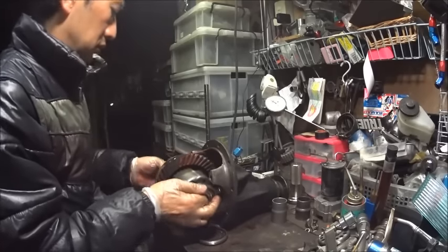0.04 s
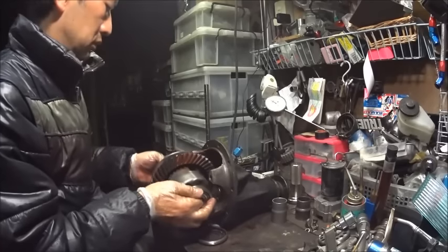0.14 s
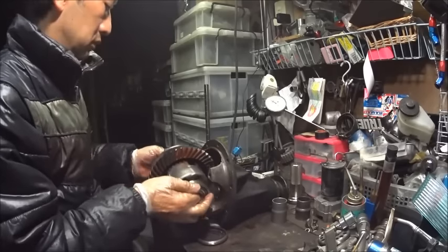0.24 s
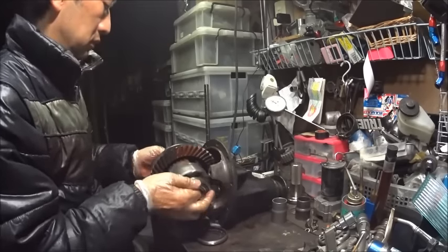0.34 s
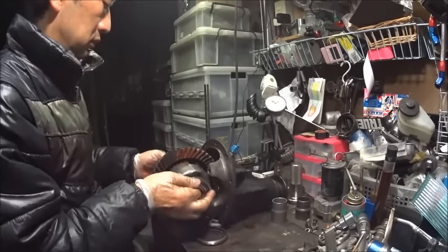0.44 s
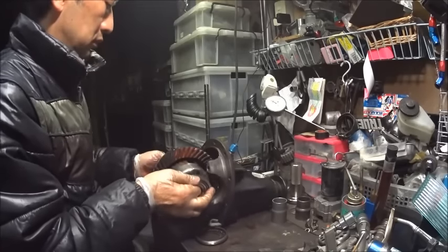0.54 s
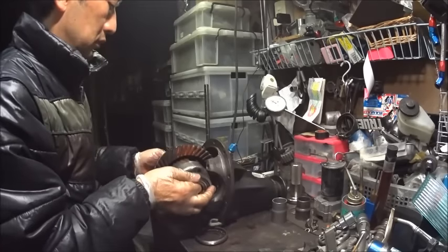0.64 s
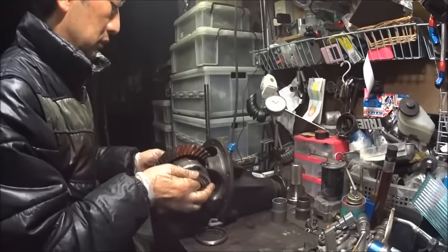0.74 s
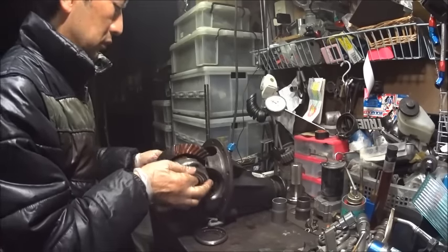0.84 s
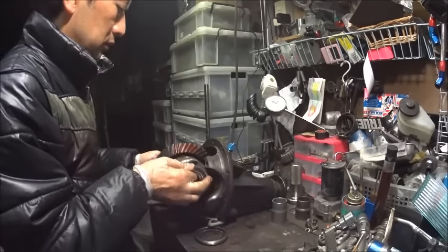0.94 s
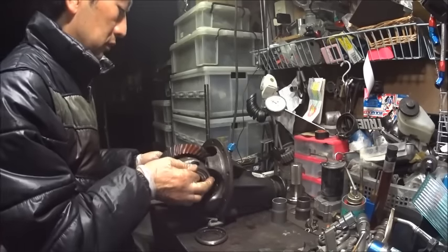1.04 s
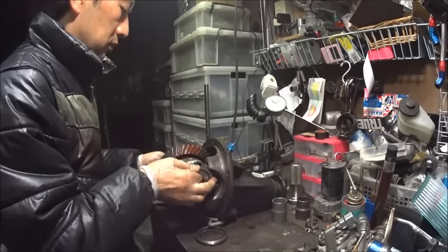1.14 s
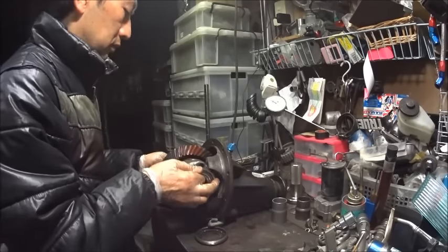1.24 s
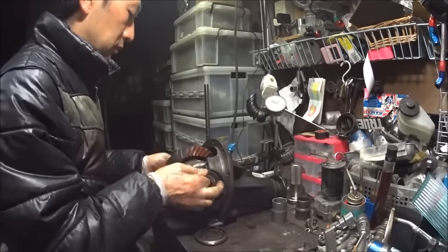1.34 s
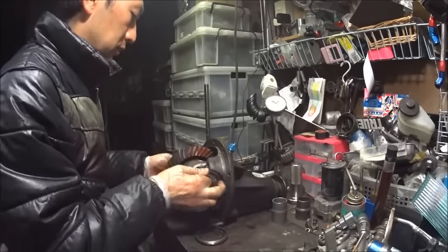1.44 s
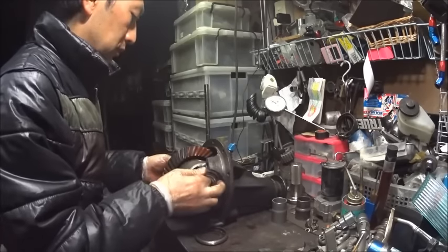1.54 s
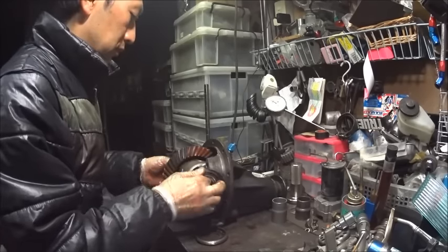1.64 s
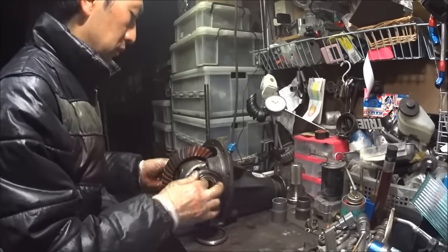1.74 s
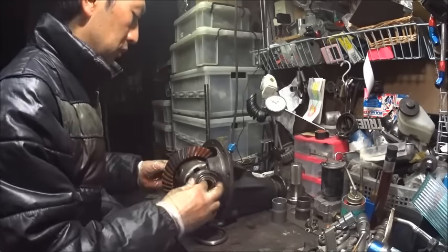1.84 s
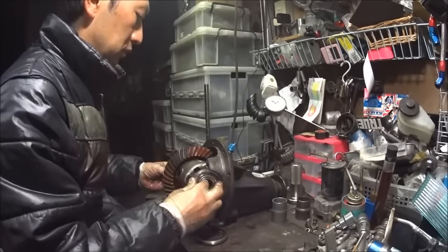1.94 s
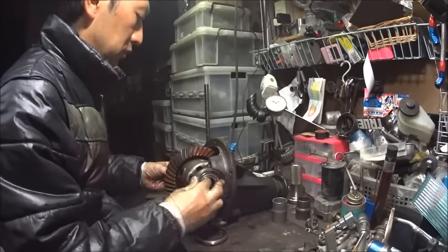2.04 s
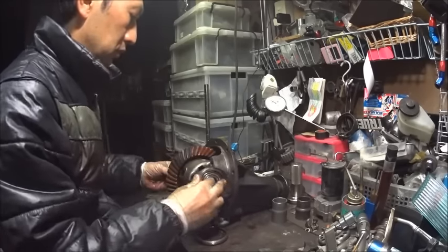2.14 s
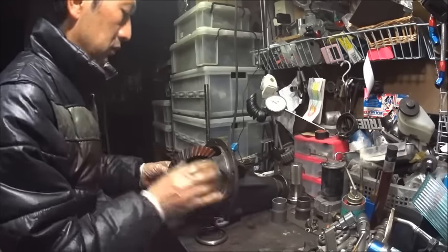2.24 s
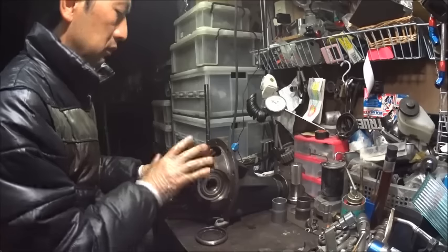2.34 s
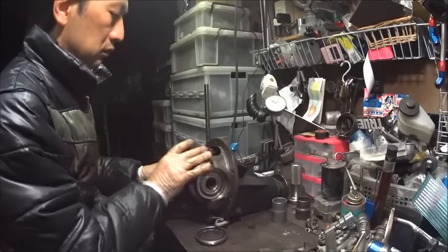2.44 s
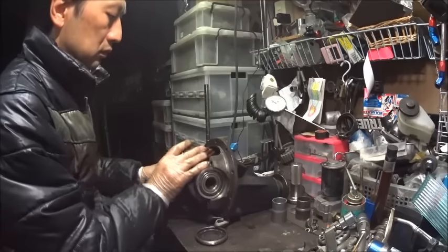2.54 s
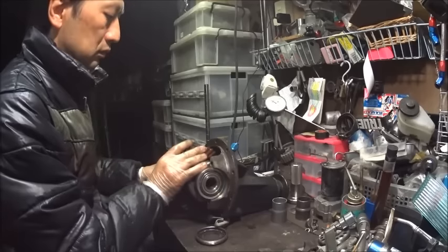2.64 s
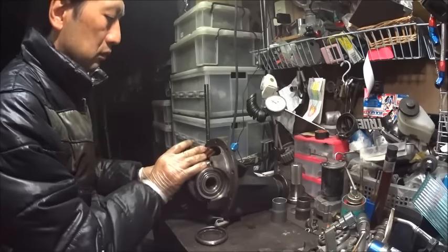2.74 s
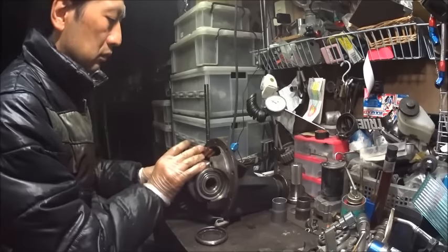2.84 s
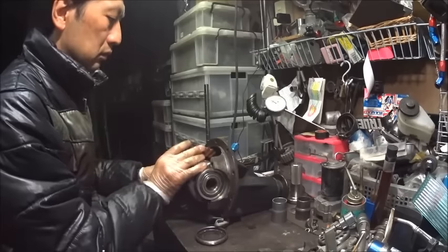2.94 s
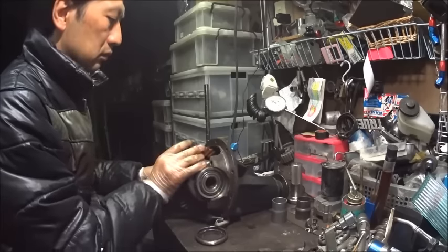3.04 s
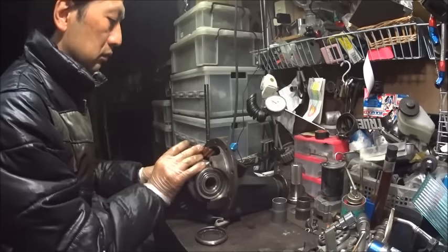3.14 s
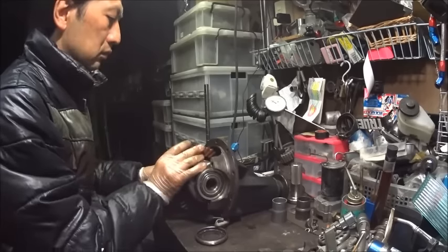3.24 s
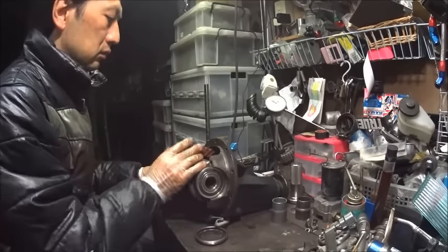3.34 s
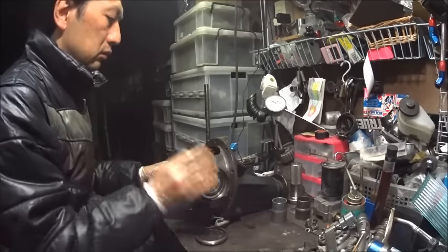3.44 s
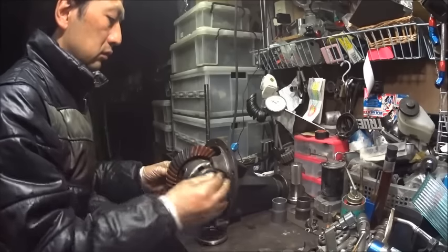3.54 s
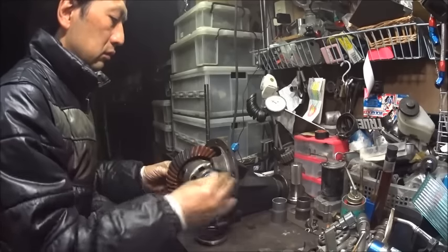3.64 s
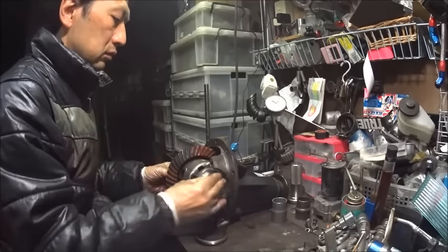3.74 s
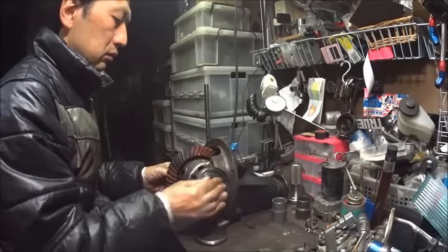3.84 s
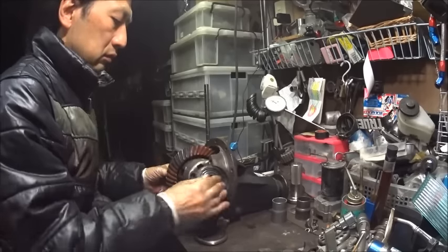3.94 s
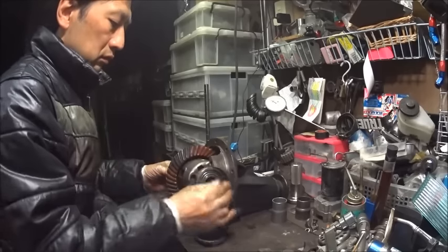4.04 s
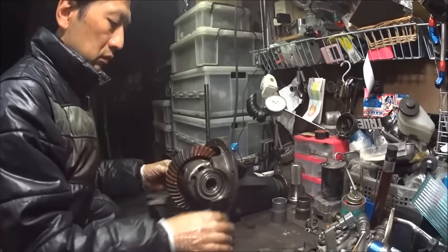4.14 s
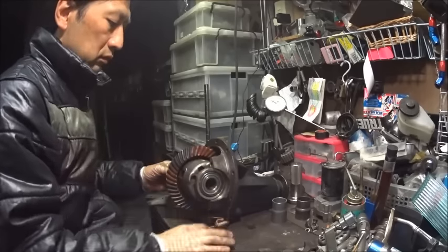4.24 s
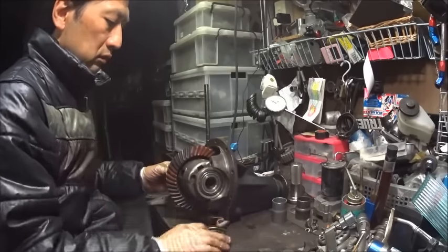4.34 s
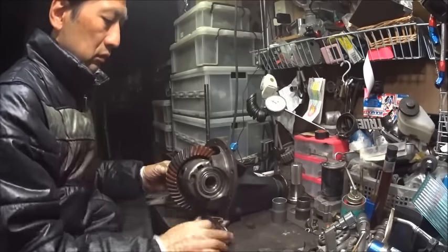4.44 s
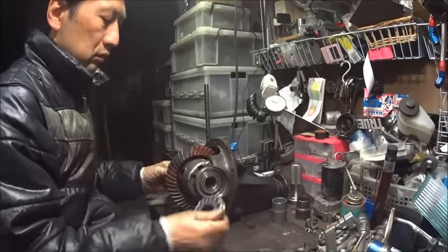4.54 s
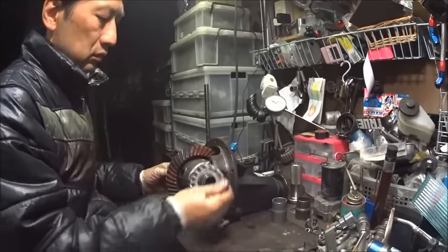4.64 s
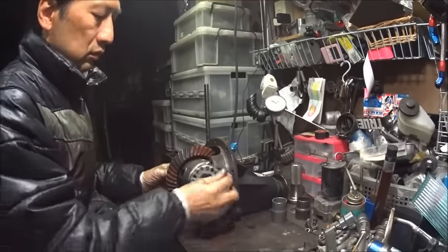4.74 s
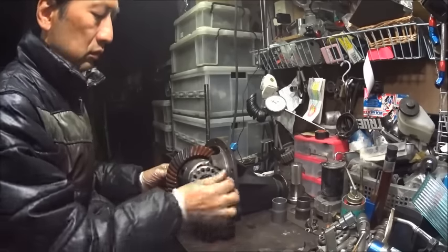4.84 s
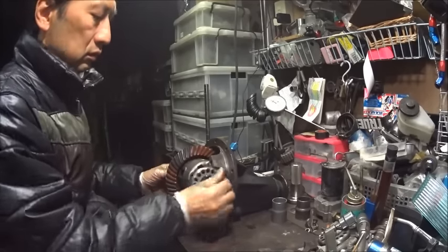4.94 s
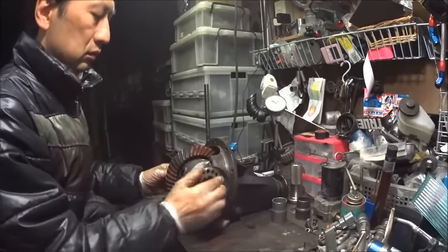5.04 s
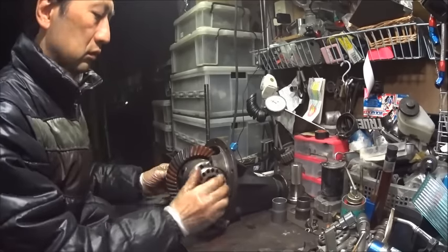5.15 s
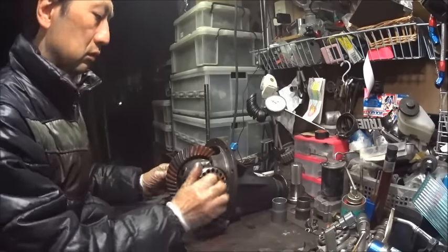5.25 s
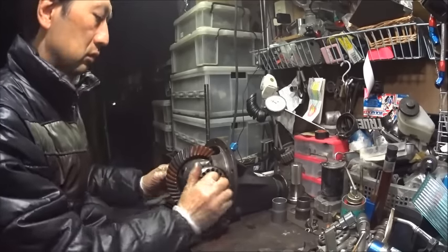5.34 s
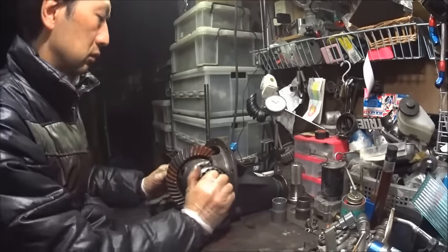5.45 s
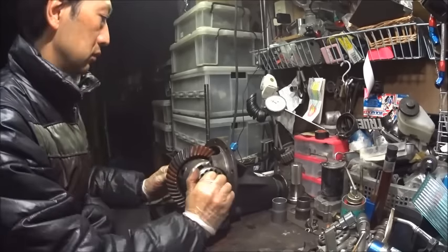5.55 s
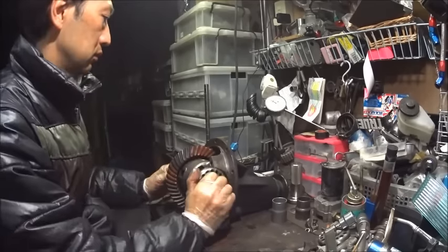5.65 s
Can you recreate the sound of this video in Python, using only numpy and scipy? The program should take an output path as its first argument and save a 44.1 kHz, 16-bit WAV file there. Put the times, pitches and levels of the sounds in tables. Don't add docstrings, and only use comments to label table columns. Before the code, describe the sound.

Heavy steel gear parts clank and knock dully on a wooden bench, sleeves rustle, then a small bearing clinks brightly into its seat.

```python
import sys
import numpy as np
from scipy import signal
from scipy.fft import rfft, irfft
from scipy.io import wavfile
from scipy.ndimage import uniform_filter1d

SR = 44100
rng = np.random.default_rng(int(sys.argv[2]) if len(sys.argv) > 2 else 0)


def gain_from_db(level_db):
    decades = np.asarray(level_db, float) / 20
    return 10 ** decades


def digitize_waveform(pressure):
    field = np.atleast_2d(pressure).T
    bounded = np.clip(field, -1, 1)
    quanta = np.round(bounded * 32767).astype(np.int16)
    wavfile.write(sys.argv[1], SR, quanta)


N = 250488
TIME = np.arange(N) / SR
GRIP_S = 0.044

# freq_hz, level_db, t60_s
BENCH_MODES = [(95.6, -17.5, 0.42), (177, -14, 0.13), (249.7, -8.5, 0.11), (299, -10.5, 0.13),
               (426, -2.5, 0.085), (490, -5, 0.033)]
# freq_hz, level_db, t60_s
HOUSING_MODES = [(621, -10.5, 0.24), (875, -21, 0.026), (850, -24, 0.084), (990, -11, 0.011),
                 (1206, -11.5, 0.058), (1500, -50, 0.22), (1560, -6.5, 0.041)]


def unit(x):
    return x / np.sqrt(np.mean(x ** 2))


def shape(table):
    hz, value = np.transpose(table)
    bin_hz = np.arange(N // 2 + 1) * SR / N + 1
    return np.interp(np.log(bin_hz), np.log(hz), value)


def noise(gain):
    return unit(irfft(rfft(rng.standard_normal(N)) * gain, N))


def band(lo_hz, hi_hz):
    hz = np.arange(N // 2 + 1) * SR / N + 1
    return 1 / np.sqrt((1 + (lo_hz / hz) ** 6) * (1 + (hz / hi_hz) ** 6))


def walk(rate_hz):
    k = int(SR / rate_hz)
    held = np.repeat(rng.standard_normal(N // k + 1), k)
    return 1.8 * uniform_filter1d(uniform_filter1d(held, k), k)[:N]


def gesture(s, db, build_s, let_go_s):
    roundness = 0.96
    away_s = TIME[::32] - s[:, None]
    scale_s = np.where(away_s < 0, build_s[:, None], let_go_s[:, None])
    part = np.abs(away_s) / np.clip(scale_s, .002, 2)
    gains = gain_from_db(db[:, None] - 20 * part ** roundness)
    return np.interp(TIME, TIME[::32], np.sqrt(np.sum(gains ** 2, axis=0)))


def ring(modes, scatter_db, detune, beat=0):
    hz, db, t60_s = np.transpose(modes)[:, :, None]
    chance = rng.standard_normal((4, len(modes), 1))
    t = TIME[:4096]
    decay = np.exp(-np.log(1000) * t / np.clip(t60_s, .02, .3))
    twin_hz = np.minimum(hz, 3000) * .03 * chance[2]
    depth = beat * np.clip(hz / 2000, 0, 1)
    throb = 1 + depth * np.cos(2 * np.pi * twin_hz * t + 2 * chance[3])
    tone = np.sin(2 * np.pi * hz * (1 + detune * chance[1]) * t)
    return np.sum(gain_from_db(db + scatter_db * chance[0]) * decay * throb * tone, axis=0)


def blows(times_s, levels_db, modes, edges_hz, contact_s, tail_db, tail_t60_s):
    out, t = np.zeros(N + 4096), TIME[:4096]
    lo_hz, hi_hz = edges_hz
    body = signal.butter(2, np.clip([1.05 * lo_hz, 0.88 * hi_hz], 30, 20000), "band", fs=SR, output="sos")
    swell = (1 - np.exp(-t / contact_s)) ** 2 * np.exp(-(t / GRIP_S) ** 2)
    width_gain = np.sqrt(SR / 2 / (hi_hz - lo_hz))
    tail = gain_from_db(tail_db) * width_gain * np.exp(-np.log(1000) * t / tail_t60_s)
    for s, db in zip(times_s, levels_db):
        at = int(s * SR)
        sound = tail * rng.standard_normal(4096)
        if modes:
            sound = sound + ring(modes, scatter_db=2, detune=.0015, beat=.6)
        sound = signal.sosfilt(body, sound * swell)
        out[at:at + 4096] += gain_from_db(db) * sound / np.abs(sound).max()
    return out[:N]


def clanks(table, rim_modes, bench_modes, housing_modes, upper_modes):
    s, rim, bench, housing, edge = np.transpose(table)
    out = blows(s, rim, rim_modes, (1600, 2800), contact_s=0.00073, tail_db=-6, tail_t60_s=0.021)
    out += blows(s, bench, bench_modes, (105, 600), contact_s=0.00044, tail_db=-3.5, tail_t60_s=0.075)
    out += blows(s, housing, housing_modes, (600, 1650), contact_s=0.00034, tail_db=4.2, tail_t60_s=0.034)
    out += blows(s, edge, upper_modes, (2800, 6500), contact_s=0.00087, tail_db=-3.5, tail_t60_s=0.021)
    out += blows(s, edge - 14, [], (6000, 12000), contact_s=0.00033, tail_db=0, tail_t60_s=0.042)
    return out


def housing_knocks():
    # start_s, rim_db, bench_db, housing_db, edge_db
    first_knocks = [
        (0.109, -41, -46, -40, -56),
        (0.2262, -26, -20.5, -14.5, -21.5),
        (0.2294, -13.5, -30, -29, -30),
        (0.324, -24.5, -15, -21, -27.5),
        (0.4254, -45, -32, -53, -49),
        (0.637, -54, -25.5, -26.5, -44.5),
        (0.7033, -53, -49, -47, -50),
    ]
    # freq_hz, level_db, t60_s
    rim_modes = [(1680, -27, 0.13), (2190, 0.5, 0.055), (2320, -1, 0.04), (2080, -3, 0.035)]
    upper_rim_modes = [(3360, -31, 0.013), (3618, 2.5, 0.064), (4910, -11, 0.071), (4530, -12, 0.057),
                       (5910, -1.5, 0.028)]
    # start_s, rim_db, bench_db, housing_db, edge_db
    turned_knocks = [(1.0904, -23, -26.5, -26.5, -40), (1.1014, -39, -52, -45, -45),
                     (1.1174, -61, -21.5, -39, -51), (1.2114, -22, -20, -20, -31.5),
                     (1.2244, -19, -25, -34, -35), (1.2754, -53, -16, -17, -34.5),
                     (1.2795, -33, -17.5, -14.5, -34), (1.3289, -25, -21.5, -30, -30.5),
                     (1.3534, -20.5, -20.5, -19, -21), (1.3568, -15.5, -18, -20, -27),
                     (1.4272, -43, -28, -35, -47), (1.4731, -42, -56, -35.5, -44)]
    # freq_hz, level_db, t60_s
    turned_rim = [(1779, -2.5, 0.04), (1818, -4.5, 0.059), (1934, -8, 0.089), (2200, 1, 0.078),
                  (2287, -0.5, 0.023)]
    turned_bench = [(102, -19, .14), (179.5, -15.5, 0.25), (262, -6, 0.088), (394, -10.5, 0.092),
                    (424, -1.5, 0.056), (540, -17, 0.096)]
    turned_housing = [(733, -6, 0.06), (850, 2, 0.025), (1028, -11, 0.071), (1168, -3.5, 0.063),
                      (1350, -9, 0.048), (1450, -5.5, 0.036)]
    turned_upper = [(3150, -10, 0.025), (3640, -9, 0.049), (4190, -8.5, 0.018), (4600, -15, 0.019),
                    (5850, -11, 0.025)]
    first = clanks(first_knocks, rim_modes, BENCH_MODES, HOUSING_MODES, upper_rim_modes)
    return first + clanks(turned_knocks, turned_rim, turned_bench, turned_housing, turned_upper)


def thuds():
    # start_s, bench_db, housing_db
    bumps = [(0.508, -14.5, -30.5), (0.596, -34, -59), (0.692, -31.5, -44), (0.713, -34.5, -57),
             (0.768, -24, -36.5), (0.793, -29, -59), (1.336, -30, -41), (2.044, -43, -36.5),
             (2.074, -35, -31.5), (3.135, -40, -47), (3.727, -26.5, -55), (3.891, -29.5, -52),
             (4.411, -46, -70)]
    s, bench, housing = np.transpose(bumps)
    out = blows(s, bench, BENCH_MODES, (100, 600), contact_s=0.0012, tail_db=-4.0, tail_t60_s=0.038)
    out += blows(s, housing, HOUSING_MODES, (600, 1500), contact_s=0.0025, tail_db=1.2, tail_t60_s=0.022)
    return out


def lone_modes():
    # start_s, level_db, freq_hz, t60_s
    boards = [(.012, -29, 220, 0.048), (.029, -35, 169, 0.047), (.064, -31.5, 357, 0.038),
              (.426, -38, 436, .12), (.508, -16, 423, 0.1), (.598, -38, 422, .12), (.637, -29, 425, 0.19),
              (.695, -23, 214, 0.045), (.713, -26, 235, .05), (.77, -26, 190, 0.069),
              (.791, -27, 422, 0.15), (.803, -27, 252, 0.12), (1.118, -28, 425, 0.093),
              (1.15, -27, 300, 0.086), (1.166, -32, 425, 0.083), (1.276, -30, 404, 0.06),
              (1.278, -25, 250, .1), (1.428, -26.5, 408, .07), (2.046, -38, 330, .05),
              (2.074, -33, 520, .04), (2.118, -41, 520, .05), (2.128, -40, 210, .05), (2.2, -43, 540, .04),
              (2.075, -17.5, 234, 0.057), (4.785, -40.5, 250, 0.12), (3.733, -30, 221, 0.08),
              (3.895, -21, 405, 0.046), (4.411, -37, 390, .05), (4.458, -35, 325, .2),
              (4.497, -35, 219, .12)]
    # start_s, level_db, freq_hz, t60_s
    steel_spots = [(.109, -35.5, 2017, 0.044), (.227, -25, 3618, 0.065), (.229, -28.5, 5850, 0.031),
                   (0.324, -28, 1500, 0.056), (.228, -27, 942, 0.093), (.326, -34.5, 1793, 0.11),
                   (.509, -26, 790, 0.045), (0.637, -31.5, 1178, 0.065), (.694, -45, 3600, 0.027),
                   (.638, -31, 660, 0.11), (0.704, -36, 1750, 0.042), (1.091, -31.5, 1796, .11),
                   (1.091, -43, 5850, 0.027), (1.096, -31, 2185, 0.09), (1.093, -45, 4170, .04),
                   (1.212, -38, 5850, 0.026), (1.228, -41, 3640, 0.089), (1.277, -28.5, 1150, .08),
                   (1.279, -26, 1495, 0.064), (1.294, -38, 4180, .03), (1.33, -42, 3650, 0.11),
                   (1.212, -22, 676, .06), (1.2245, -25.5, 1810, 0.078), (1.277, -37, 4110, 0.06),
                   (1.354, -27, 4540, 0.028), (1.354, -27, 5890, 0.044), (1.357, -43, 3640, 0.061),
                   (2.076, -32, 1170, 0.048), (2.2, -44, 830, .04), (2.217, -42, 1100, .05),
                   (2.838, -32, 2650, 0.024), (2.838, -35.5, 2940, 0.028), (2.842, -38, 2050, .04),
                   (2.859, -41, 2340, 0.035), (3.7257, -15.5, 3700, .012), (3.7258, -13.5, 6500, 0.011),
                   (3.728, -21, 10450, 0.0098), (3.727, -34, 1063, 0.056), (3.8991, -27.5, 2660, .015),
                   (3.9025, -23, 5920, 0.018), (4.517, -27.5, 7900, 0.023), (4.787, -19.5, 3835, 0.058),
                   (4.782, -23.5, 2210, .12), (4.889, -27, 2073, .09), (4.888, -27, 6860, .015),
                   (4.886, -31.5, 10880, 0.036), (5.097, -33.5, 2800, 0.028), (5.098, -36, 1450, .03),
                   (5.059, -42, 4120, .03),
                   (3.7255, -27, 1750, .02), (3.7258, -26, 2920, 0.014), (3.856, -38, 3200, 0.017),
                     (3.856, -33, 7200, .015), (3.872, -38, 7000, .015), (3.888, -36, 3100, .015),
                     (4.7792, -24, 6000, .015), (4.785, -26, 6700, .012), (4.79, -31, 5630, .04),
                     (4.781, -26, 4500, .02), (4.796, -29, 4150, .03), (4.8, -31, 3200, .04),
                     (4.818, -29, 2200, 0.056), (4.968, -36.5, 10900, 0.054), (4.969, -41, 900, .03),
                     (5.034, -42, 2200, .04), (5.058, -37, 10390, 0.064), (5.058, -38, 3300, .015),
                     (5.098, -41, 4200, .025), (5.16, -45, 3200, .03), (5.172, -43, 4700, .03),
                     (5.205, -42, 6400, .03)]
    rattle_hz, rattle_db, rattle_rad = 260, 3.5, .55
    out, t = np.zeros(N + 4096), TIME[:4096]
    shake_db = rattle_db * np.pad(walk(rattle_hz), (0, 4096))
    shake_rad = rattle_rad * np.pad(walk(rattle_hz), (0, 4096))
    for s, db, hz, t60_s in boards + steel_spots:
        at = int(s * SR)
        loose = min(hz / 2000, 1)
        swell = (1 - np.exp(-t * hz / 0.6)) * np.exp(-(t / GRIP_S) ** 2)
        fading = gain_from_db(db - 60 * t / t60_s + loose * shake_db[at:at + 4096])
        tone = np.sin(2 * np.pi * hz * t + loose * shake_rad[at:at + 4096])
        out[at:at + 4096] += swell * fading * tone
    return out[:N]


def clinks(table, seat_modes, housing_modes, cage_modes, race_modes, race_hz, race_tail_db, cage_db):
    s, seat, housing, crack, race = np.transpose(table)
    out = blows(s, seat, seat_modes, (1600, 2800), contact_s=0.0004, tail_db=2.2, tail_t60_s=0.048)
    out += blows(s, housing, housing_modes, (600, 1650), contact_s=0.00021, tail_db=2.2, tail_t60_s=0.079)
    out += blows(s, seat + cage_db, cage_modes, (2800, 5000), contact_s=0.000093, tail_db=0, tail_t60_s=0.064)
    out += blows(s, crack, [], (5000, 9200), contact_s=0.00067, tail_db=0, tail_t60_s=0.027)
    out += blows(s, race, race_modes, (race_hz, 13000), contact_s=0.0017, tail_db=race_tail_db, tail_t60_s=0.012)
    return out


def bearing_fitting():
    # start_s, seat_db, housing_db, crack_db, race_db
    seat_clinks = [
        (4.7791, -20, -28, -17.5, -9),
        (4.7843, -23.5, -40, -19.5, -15),
        (4.7905, -24, -38, -27, -24),
        (4.7964, -25, -40, -31, -17),
        (4.8066, -39, -31, -31, -36),
        (4.8179, -26.5, -33, -31, -47),
    ]
    # freq_hz, level_db, t60_s
    seat_modes = [(2210, -4.5, 0.06), (1920, -18, 0.026), (2510, -0.5, 0.052)]
    cage_modes = [(3208, -9, 0.037), (3450, 1.5, 0.018), (3835, 0, 0.078), (4700, -2, 0.025)]
    race_modes = [(9475, -9, .07), (9528, -12, .08), (9647, -22, .15), (10384, -1, .09), (10440, -9, .07),
                  (10935, 0, .055)]
    # start_s, seat_db, housing_db, crack_db, race_db
    settling_taps = [
        (4.8874, -24, -27, -31, -34),
        (4.9686, -38, -39.5, -52, -33),
        (5.058, -34, -45, -39, -33),
        (5.0884, -50, -28.5, -44, -56),
        (5.0978, -33.5, -38, -46, -38),
        (5.2051, -32.5, -42, -48, -31),
    ]
    # freq_hz, level_db, t60_s
    settled_seat = [(2087, -2, 0.03), (2225, 2.2, 0.044), (2460, 0, 0.033)]
    settled_housing = [(682, 0, 0.076), (793, 6, 0.038), (877, -4, 0.044)]
    settled_cage = [(3120, -8, 0.02), (3580, -13, 0.02), (3970, -1, 0.018), (4500, -3, .022)]
    landing = clinks(seat_clinks, seat_modes, HOUSING_MODES, cage_modes, race_modes,
                     race_hz=8700, race_tail_db=-21.5, cage_db=-0.5)
    settling = clinks(settling_taps, settled_seat, settled_housing, settled_cage, [],
                      race_hz=9700, race_tail_db=0, cage_db=-3)
    return landing + settling


def ticks():
    # start_s, ping_db, housing_db, crack_db, sharpness_db
    tick_events = [(0.703, -43, -60, -43.5, -1.5), (1.354, -54, -50, -24, -0.5),
                   (2.1964, -49, -42, -44.5, 12), (2.5399, -39.5, -64, -47, -5),
                   (2.8381, -33, -37.5, -36.5, 6), (2.8587, -39, -61, -46, -1),
                   (3.1732, -37.5, -68, -47, -7), (3.7243, -27.5, -29.5, -17.5, -1),
                   (3.855, -60, -55, -35.5, -4.5), (3.871, -44, -50, -38.5, -5),
                   (3.888, -42, -38, -27.5, 0), (3.9, -33.5, -35, -24, -1), (4.054, -65, -60, -43.5, -3.5),
                   (4.3, -44, -49, -42, -2), (4.5171, -49, -52, -32.5, 2)]
    # freq_hz, level_db, t60_s
    ping_modes = [(1844, -5, 0.027), (2390, 7, 0.025), (2580, -13, 0.011)]
    s, ping, housing, crack, sharp = np.transpose(tick_events)
    out = blows(s, ping, ping_modes, (1600, 3000), contact_s=0.00029, tail_db=0, tail_t60_s=0.044)
    out += blows(s, housing, [], (600, 1650), contact_s=0.00073, tail_db=0, tail_t60_s=0.088)
    out += blows(s, crack - sharp, [], (2800, 5000), contact_s=0.00047, tail_db=0, tail_t60_s=0.013)
    out += blows(s, crack, [], (5000, 8000), contact_s=0.0003, tail_db=0, tail_t60_s=0.03)
    out += blows(s, crack + sharp, [], (8000, 12000), contact_s=0.0022, tail_db=0, tail_t60_s=0.0096)
    return out


def drags(table, wood_modes, steel_modes, low_hz):
    grit = rng.standard_normal(N) * gain_from_db(2.85 * walk(140))
    t = TIME[:4096]
    wood_ring = ring(wood_modes, scatter_db=0, detune=0) * np.exp(-t / .014)
    steel_ring = ring(steel_modes, scatter_db=0, detune=0) * np.exp(-t / .002)
    wood = unit(signal.fftconvolve(grit, wood_ring)[:N])
    steel = unit(signal.fftconvolve(grit, steel_ring)[:N])
    s, wood_db, steel_db, build_s, let_go_s = np.transpose(table)
    out = wood * gesture(s, wood_db, build_s, let_go_s) + steel * gesture(s, steel_db, build_s, let_go_s)
    return signal.sosfilt(signal.butter(3, low_hz, "high", fs=SR, output="sos"), out)


def housing_drags():
    # peak_s, bench_db, housing_db, build_s, let_go_s
    scrapes = [
        (0.03, -43, -57, 0.13, 0.12),
        (0.808, -38.5, -53, 0.027, 0.097),
        (1.125, -28, -60, 0.011, .06),
        (1.442, -44, -49, 0.0043, 0.027),
        (1.165, -31, -64, 0.053, 0.045),
        (1.47, -51, -50, .03, 0.068),
        (2.08, -42, -45, 0.012, 0.045),
        (2.11, -56, -52, .02, 0.088),
        (5.55, -83, -51.5, 0.14, 1),
    ]
    return drags(scrapes, BENCH_MODES, HOUSING_MODES, low_hz=65.5)


def bearing_slide():
    # peak_s, bench_db, steel_db, build_s, let_go_s
    strokes = [
        (4.41, -47, -45.5, 0.054, 0.016),
        (4.465, -34, -36.5, 0.019, 0.052),
        (4.505, -29.5, -33, 0.059, 0.028),
    ]
    # freq_hz, level_db, t60_s
    slide_wood = [(288, -5, 0.039), (330, -4.5, 0.068), (465, -8, 0.14)]
    slide_steel = [(774, 3, 0.018), (1260, -6, 0.032), (1526, 6, 0.045), (1750, -19, .04)]
    return drags(strokes, slide_wood, slide_steel, low_hz=220)


def folds(low_hz, count, shared_db):
    out = 0
    for hz in low_hz * 2 ** (np.arange(count) / 4):
        flicker = gain_from_db(shared_db + 2.2 * walk(30))
        out = out + np.sqrt(hz) * flicker * noise(band(hz / 1.43, hz * 1.6))
    return unit(out)


def rustle():
    # peak_s, level_db, build_s,
    # let_go_s, brightness_db
    swishes = [(0.02, -55, .3, .4, -9), (0.116, -45, 0.063, 0.033, 0), (0.2, -61, 0.19, 0.45, -25),
               (0.456, -44.5, 0.034, 0.0098, 5.5), (0.49, -67, 0.055, 0.99, -30),
               (0.891, -50.5, 0.013, 0.03, 15), (1.47, -54.5, 0.24, 0.1, -11), (1.62, -52, 0.071, 0.24, 1),
               (1.88, -59.5, 0.96, 0.46, 9.5), (2.11, -51, 0.16, 0.13, -13), (2.202, -50, .008, 0.13, 0),
               (2.26, -45.5, 0.11, 0.046, 5.5), (2.401, -43, 0.16, 0.27, 3.5),
               (2.525, -50.5, 0.022, 0.02, 19), (2.698, -52, 0.04, 0.22, 2), (2.88, -55, 0.12, 0.037, 8),
               (3.182, -55.5, 0.057, 0.022, 3),
               (3.385, -50.5, 0.068, 0.083, 12.5), (3.44, -53, 0.13, 0.18, -13),
               (3.54, -52, 0.16, 0.093, 11), (3.68, -54.5, 0.49, 0.38, -3),
               (3.805, -47.5, 0.027, 0.068, 11.5), (3.848, -46, 0.046, 0.044, 7),
               (4.04, -58.5, 0.15, 0.52, 1), (4.19, -49.5, 0.15, 0.58, 1.5),
               (4.366, -44.5, 0.1, 0.043, 9.5), (4.463, -43.5, 0.019, 0.4, 5),
               (4.53, -46.5, 0.045, 0.03, 14.5), (4.62, -46.5, 0.6, 0.6, 0.5),
               (4.776, -41.5, 0.036, 0.16, 12.5), (4.85, -49, .05, 0.046, 0.5), (5.0, -54, 0.025, 0.09, 17),
               (5.061, -45, 0.0066, 0.01, -14), (5.12, -49.5, 0.14, 0.19, -4),
               (5.204, -44.5, 0.066, 0.19, 5.5), (5.285, -46, 0.081, 0.11, 4),
               (5.39, -52.5, 0.12, 0.38, -9.5), (5.678, -51.5, 0.012, 0.12, 10)]
    top_steepness, low_steepness = 0.94, 0.76
    low_db, low_tilt = -3.5, 0.49
    s, db, build_s, let_go_s, bright_db = np.transpose(swishes)
    top = gesture(s, db + bright_db, build_s / top_steepness, let_go_s / top_steepness)
    middle = gesture(s, db, build_s, let_go_s)
    low = gesture(s, db + low_db - low_tilt * bright_db, build_s / low_steepness, let_go_s / low_steepness)
    shared_db = .8 * walk(45) + 1.5 * walk(500)
    out = top * folds(14100, count=3, shared_db=shared_db)
    out += middle * folds(3740, count=4, shared_db=shared_db)
    out += low * folds(770, count=6, shared_db=shared_db)
    return out


def garage():
    # freq_hz, density_db
    air_spectrum = [(20, -3), (38, -1.5), (110, 2.5), (200, -2.5), (640, -5.5), (2000, -13.5),
                    (8000, -27.5), (11000, -22)]
    # time_s, level_db
    low_swell = [(0.0, -53.5), (0.68, -47), (0.842, -52.5), (1.12, -56.5), (1.28, -48), (1.47, -51),
                 (1.82, -56), (2.34, -53.5), (3.1, -56.5), (4.81, -53.5), (5.68, -53.5)]
    # centre_hz, width_hz, level_db
    shell_hums = [(150.6, 14, -64.5), (201, 11.6, -60.5), (251.7, 17, -66), (670.4, 66, -61),
                  (764, 80, -78)]
    hz = np.arange(N // 2 + 1) * SR / N
    s, swell_db = np.transpose(low_swell)
    swelling = band(87, 1450)
    spectrum = gain_from_db(shape(air_spectrum))
    out = noise(spectrum * (1 - swelling)) * gain_from_db(-58)
    out += noise(spectrum * swelling) * gain_from_db(np.interp(TIME, s, swell_db) + 1.0)
    for centre_hz, width_hz, db in shell_hums:
        out += gain_from_db(db + 0.6 * walk(4.9)) * noise(1 / (1 + (2 * (hz - centre_hz) / width_hz) ** 2))
    return out


def room(near):
    t60_s, level_db = 0.11, -9
    t = TIME[:16384]
    tails = rng.standard_normal((2, 16384)) * np.exp(-np.log(1000) * t / t60_s) * (t > .003)
    colour = rfft(tails)
    tails = irfft(colour / np.sqrt(uniform_filter1d(np.abs(colour) ** 2, size=75)))
    tails *= gain_from_db(level_db) / np.sqrt(np.sum(tails ** 2, axis=1, keepdims=True))
    return signal.fftconvolve(near[None], tails, axes=1)[:, :N]


def clutter(near):
    scatter = rng.standard_normal(1024) * np.exp(-TIME[:1024] / 0.0018)
    return gain_from_db(-10) * signal.fftconvolve(near, scatter / np.sqrt(np.sum(scatter ** 2)))[:N]


def ports(mid, other):
    # freq_hz, level_db
    side_level = [(60, -21), (110, -23), (190, -19.5), (350, -12), (630, -9.5), (2020, -2), (3630, -3.5),
                  (11700, -4)]
    # freq_hz, level_db
    balance = [(60, 0.2), (400, -0.5), (1500, 0), (2500, -0.5), (5000, 0.5), (11700, 1.5)]
    tilt = np.tanh(shape(balance) * np.log(10) / 40)
    spread = gain_from_db(shape(side_level) - 3.0)
    side = irfft(rfft(mid) * (tilt + 1j * spread * gain_from_db(-3.0)) + rfft(other) * spread, N)
    return np.array([mid + side, mid - side])


def scene():
    housing = housing_knocks() + thuds() + housing_drags()
    bearing = bearing_fitting() + ticks() + bearing_slide()
    near = housing + bearing + lone_modes() + rustle()
    wet = room(near)
    drone = garage()
    other = clutter(near) + gain_from_db(-1.0) * wet[1] + gain_from_db(5.5) * drone[::-1]
    return ports(near + wet[0] + drone, other)


def band_limit(x):
    return signal.sosfilt(signal.butter(12, 12320, fs=SR, output="sos"), x)


def record(dry):
    top_hz = 11080
    mix = signal.sosfilt(signal.ellip(11, .3, 66, top_hz, fs=SR, output="sos"), dry)
    return band_limit(mix)


dry = scene()
out = record(dry)
digitize_waveform(out)
```